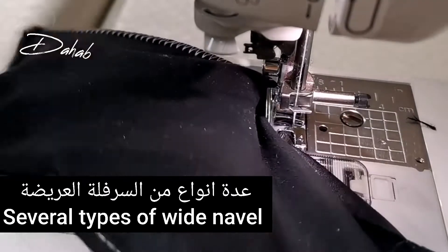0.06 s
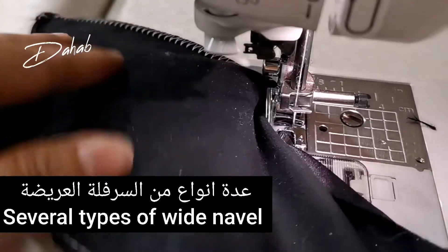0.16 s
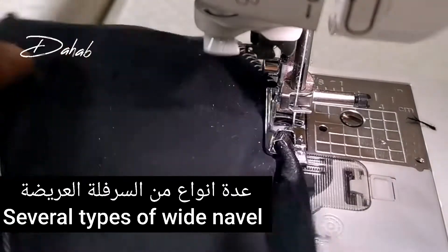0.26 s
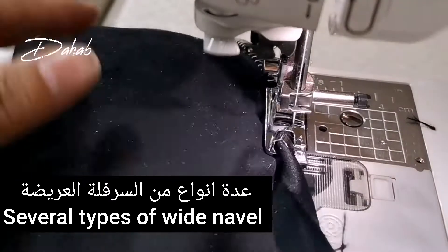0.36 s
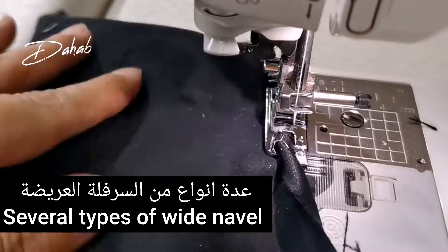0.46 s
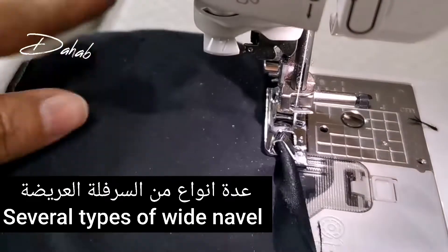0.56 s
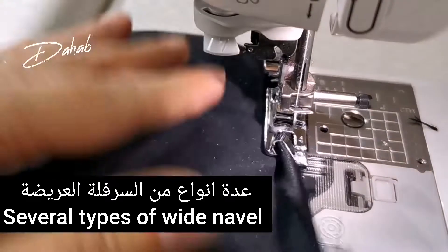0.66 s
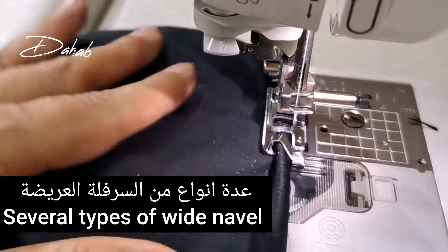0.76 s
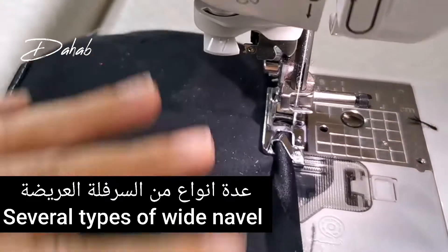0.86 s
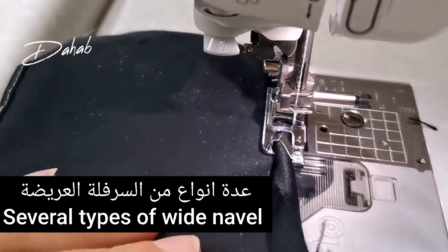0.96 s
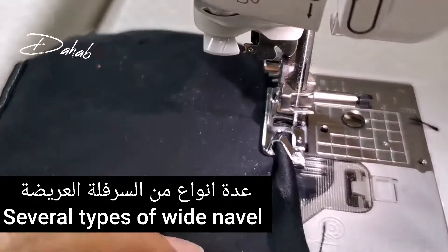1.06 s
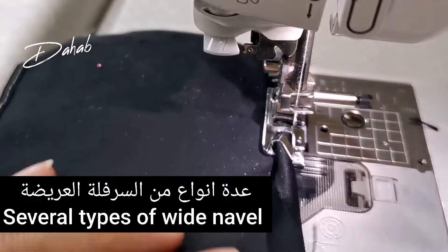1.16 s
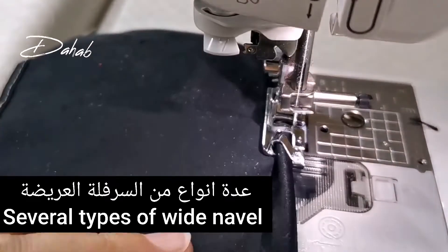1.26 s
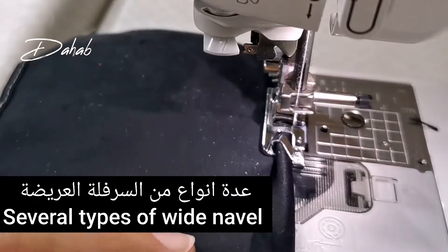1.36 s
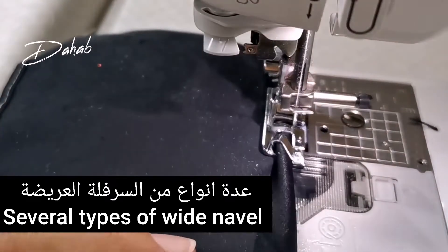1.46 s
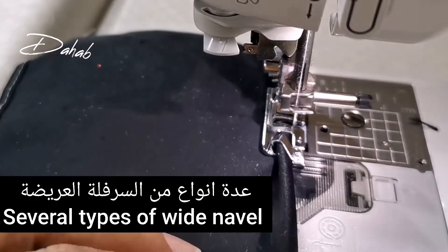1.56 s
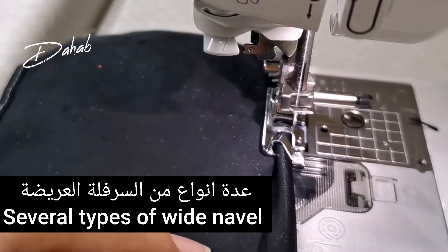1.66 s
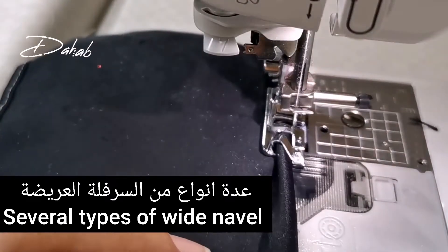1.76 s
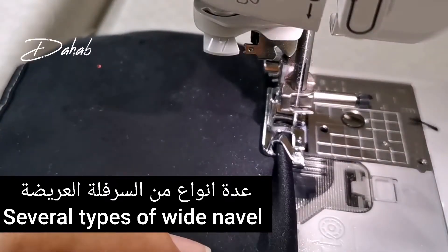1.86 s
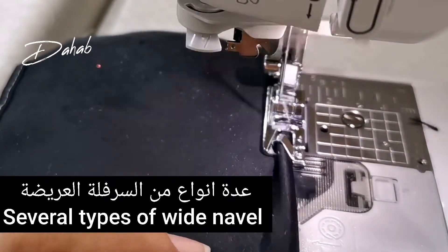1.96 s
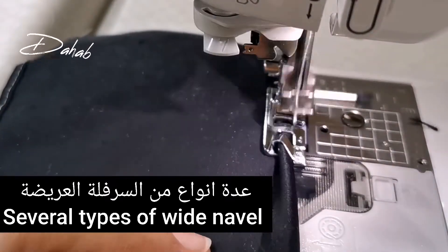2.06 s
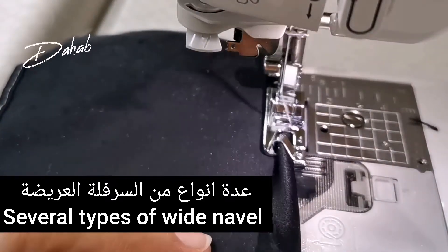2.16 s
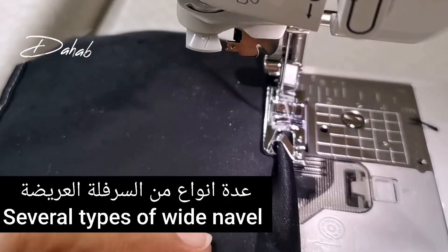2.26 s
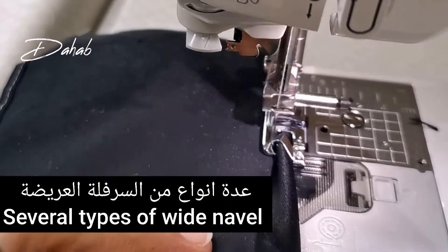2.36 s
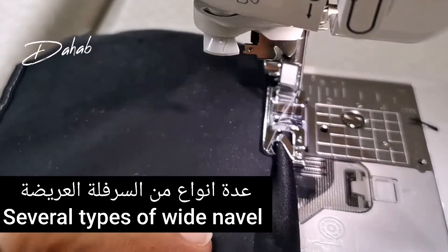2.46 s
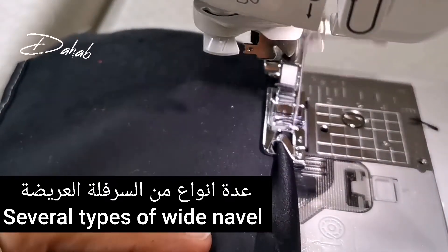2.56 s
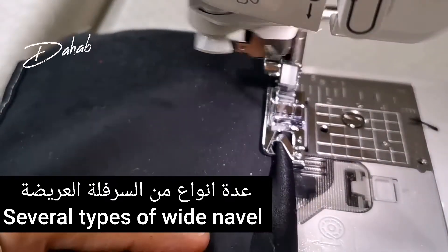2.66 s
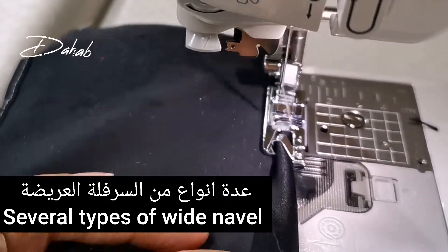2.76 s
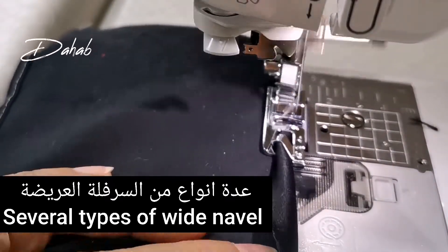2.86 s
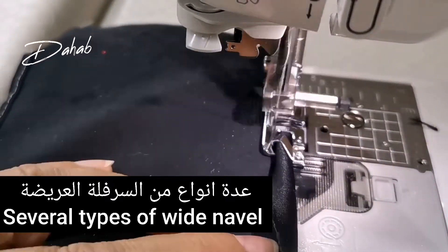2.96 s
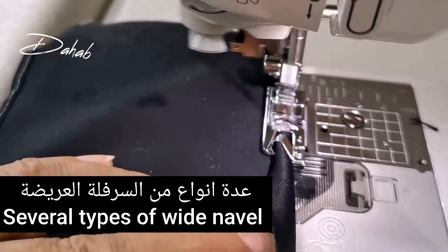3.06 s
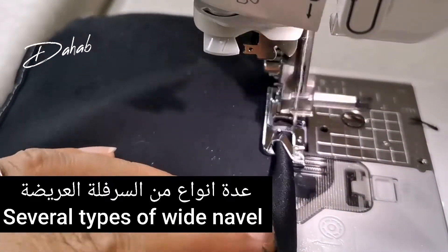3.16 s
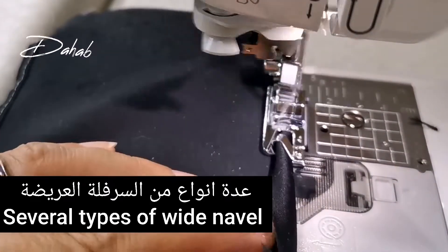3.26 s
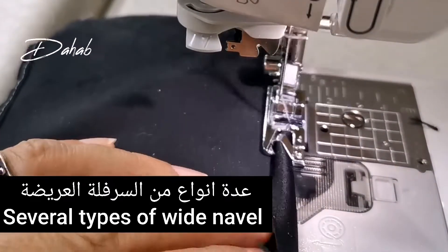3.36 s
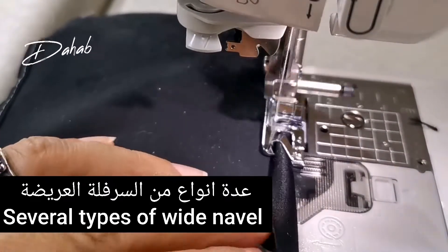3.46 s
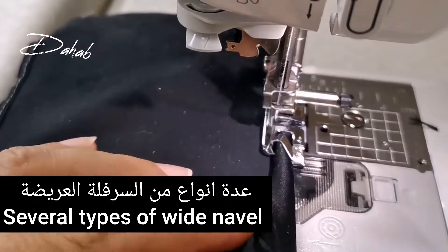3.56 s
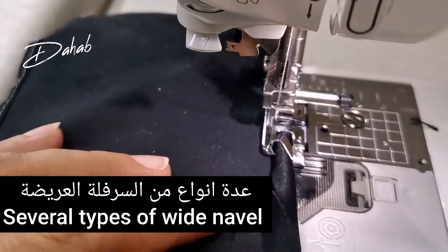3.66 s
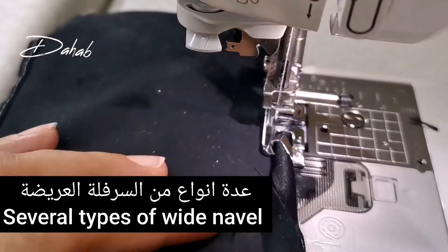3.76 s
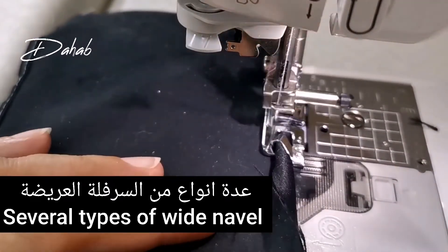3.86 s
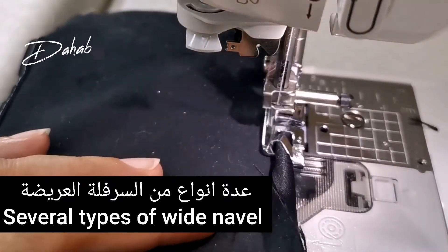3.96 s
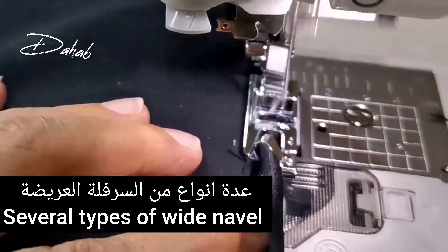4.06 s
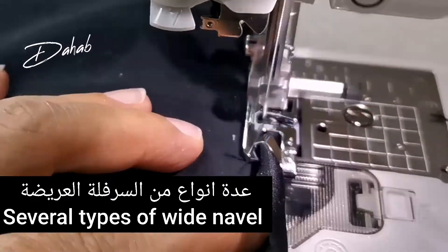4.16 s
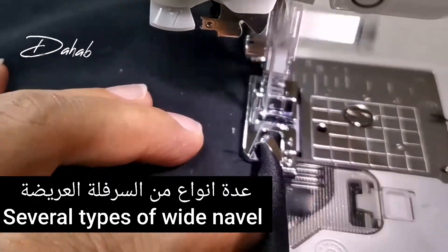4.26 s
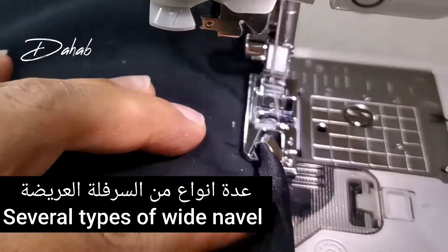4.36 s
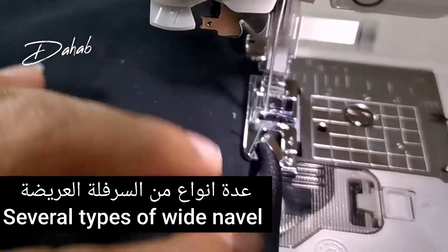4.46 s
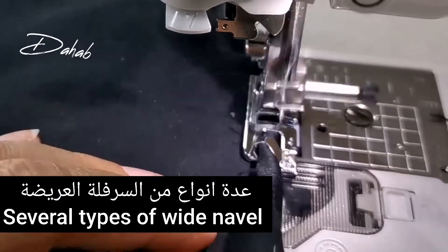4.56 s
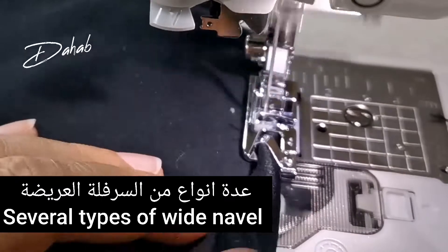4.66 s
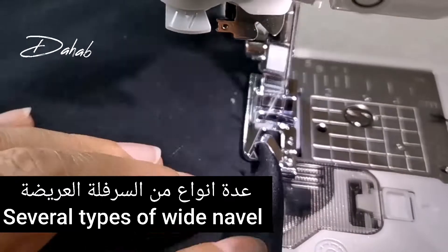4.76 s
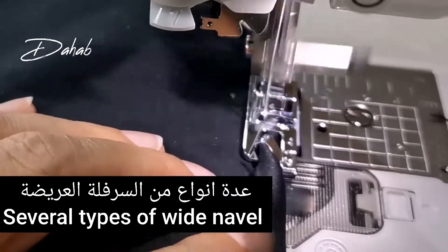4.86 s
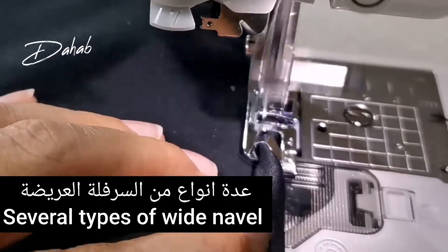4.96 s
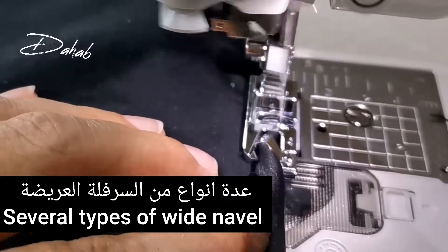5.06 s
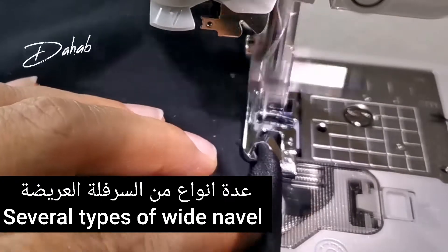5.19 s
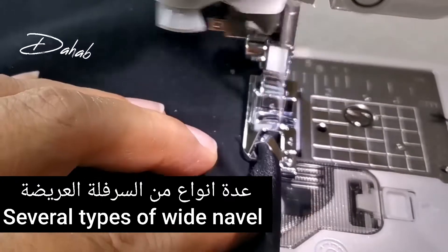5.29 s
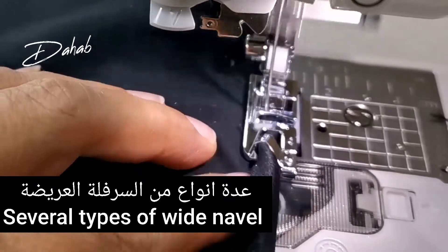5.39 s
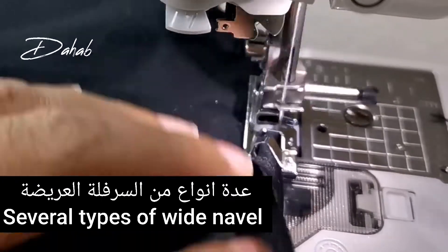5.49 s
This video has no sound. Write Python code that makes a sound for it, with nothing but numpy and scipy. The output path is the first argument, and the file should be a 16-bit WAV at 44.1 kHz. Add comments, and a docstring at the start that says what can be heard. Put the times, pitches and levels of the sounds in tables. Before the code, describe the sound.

Soft cloth swishes and hollow housing knocks come first, followed by near silence and a small click. A sewing machine jerks, hums low, then accelerates into quick metallic rasps and clacks under a climbing gear whine. After a half-second pause it starts again at constant speed, with low feed thuds and sharp ticks. Close stereo microphone, dry small room, faint low background noise.

```python
"""An electric sewing machine takes a first stitch, creeps, speeds up with a rising whine and stops; then it
runs at a steady speed in a three-stitch cycle. Gear-mesh sines make the whine, filtered noise the drive. Each
stitch is a rasp and a clack, at times with a thud of the needle bar swinging sideways: noise and blows ringing
damped modes. Cloth sliding (swelling noise), knocks, ticks and brief singing drags surround it, close by in a
small room."""
import sys
import numpy as np
from scipy import signal
from scipy.fft import rfft, irfft, next_fast_len
from scipy.io import wavfile
from scipy.ndimage import uniform_filter1d

SR = 44100
rng = np.random.default_rng(int(sys.argv[2]) if len(sys.argv) > 2 else 0)


def to_wav(s):
    """Save 16-bit WAV."""
    ch = np.atleast_2d(s).T  # columns
    pcm = np.round(np.clip(ch, -1, 1) * 32767)  # PCM
    wavfile.write(sys.argv[1], SR, pcm.astype(np.int16))


N = 243873
T = np.arange(N) / SR
FREQS = np.fft.rfftfreq(N, 1 / SR)

# All levels are relative: the functions add further gains.
# Room: background noise spectrum (frequency [Hz], level [dB])
ROOM_NOISE = [(12, -50), (20, 5.5), (52, 5), (91, -5.5), (172, -2.5), (472, -11.5), (738, -11.5),
              (1570, -18), (3340, -26), (4810, -22), (6180, -38), (8180, -49), (9950, -43), (14700, -27),
              (16000, -30)]
# Colour of the reverberant tail (frequency [Hz], level [dB])
TAIL_COLOUR = [(300, -6.5), (2000, 2.0), (12000, -10.0)]
ROOM_T60_S, ROOM_DB, FLOOR_DB = 0.17, -8.5, -64
# Left minus right (frequency [Hz], level difference [dB])
BALANCE = [(200, 2), (420, -1.5), (810, 3), (1050, -6.5), (1540, 1.5), (3000, 0), (4100, -3), (6200, -1),
           (7200, -3.5), (8300, -13), (9300, 3), (10000, 7.5), (12200, 6), (15500, 1.5)]
# Likeness of the two sides (frequency [Hz], correlation [-1 to 1])
LIKENESS = [(30, 0.16), (80, 0.33), (150, 0.94), (850, 0.45), (1150, 0.1), (4000, 0.033), (4700, 0.43),
            (5500, 0.034), (7200, 1), (9300, 0.26), (10000, 0.062), (13000, 0.41)]
# Lead of the left side (frequency [Hz], phase [rad])
LEAD = [(100, .03), (300, .4), (600, .9), (1000, 1.0), (1450, 2.9), (3700, 2.9), (4400, 4.5), (5300, 4.3),
        (5900, 6.28), (15000, 6.2)]
CUTOFF_HZ = 15800

# Cloth pushed over the bed (peak time [s], swish level [dB], rub level [dB], rise [s], fall [s])
SLIDES = [(.05, -63, -62, 0.054, 0.022), (.11, -64.5, -60, 0.018, 0.045),
          (0.335, -54, -52.5, 0.053, 0.0097), (.405, -73, -56, 0.036, 0.02), (.51, -68, -51, 0.021, .01),
          (.57, -54, -58, 0.031, 0.07), (0.757, -55, -47.5, 0.014, 0.039), (.87, -64.5, -67, 0.031, 0.019),
          (1.056, -65, -71, 0.062, 0.038), (1.24, -67, -58, .12, .05), (1.42, -73.5, -62.5, 0.068, 0.058),
          (1.56, -66.5, -56, 0.065, 0.017), (1.72, -70, -62.5, 0.11, 0.0083),
          (1.9, -65.5, -58, 0.041, 0.011), (3.65, -68, -83, 0.046, 0.059)]
# Bright swish of the cloth (frequency [Hz], level [dB])
SWISH = [(400, -8), (900, 9.5), (1400, 0), (2200, -2.5), (2800, 3), (3700, -4), (4900, 8.5), (6100, -0.5),
         (7200, -0.5), (8300, 3.5), (9500, -1.5), (12000, -4), (13500, -1.5), (16000, -3.5)]
# Dull rub of the cloth (frequency [Hz], level [dB])
RUB = [(60, -4), (125, 15.5), (200, 12), (320, 11), (520, 3), (780, 1), (1400, -30), (3000, -48.5)]
WHISPER_DB, RESTING_RUB_DB = -81.5, -81   # steady cloth noise under resting hands

# Lever, hands, drive or a hard needle-bar clack knock on the housing
# (time [s], peak level [dB], push pitch [Hz], spread [octaves], crack level [dB])
KNOCKS = [(.102, -49, 170, 0.46, -68), (0.2371, -31, 588, 0.22, -53), (0.246, -33.5, 363, 0.099, -81),
          (0.5111, -32, 840, 0.19, -54), (0.5133, -31, 334, 0.33, -54.5), (0.567, -47.5, 650, 0.7, -58),
          (0.7513, -25, 650, 0.26, -39), (.7555, -33, 480, 0.15, -68), (1.719, -55, 875, 0.33, -79),
          (1.98, -37, 410, 0.22, -75), (1.99, -33, 446, 0.24, -56), (3.034, -35, 462, 0.1, -75),
          (4.027, -58, 666, 0.3, -64), (4.916, -31, 980, .1, -64), (5.389, -26, 724.7, 0.18, -60)]
# Bright crack of a knock (frequency [Hz], level [dB])
KNOCK_CRACK = [(400, 7), (1000, 22), (1450, 15.5), (2300, 7.5), (2800, 10.0), (3800, 4.5), (5000, 7.0),
               (7000, -5.0), (16000, -14)]
# Modes of the housing (frequency [Hz], level [dB], decay by 60 dB [s])
HOUSING = [(154, 16, 0.016), (158, 3.5, 0.12), (256, 3, 0.041), (298.4, 2.5, 0.079), (352, -3, 0.033),
           (454, 4, 0.062), (542, -1.5, 0.039), (685.6, -5, 0.044), (773.5, 1, 0.025), (908, -1, 0.018),
           (1013, 2.5, 0.042), (1144, -4, 0.096), (1250, 11, 0.024), (1620, 2, 0.11)]
BASS_EDGE_HZ = 140

# Cloth drags over needle plate and foot (middle time [s], level [dB], length [s], ring pitch [Hz])
DRAGS = [(1.064, -54, 0.012, 4860), (1.237, -56, 0.024, 2620), (1.55, -60, 0.012, 1170),
         (2.437, -48.5, 0.013, 2800)]

# A loose part brushes the housing, then chatters
CHATTER_S, CHATTER_DB, CHATTER_HZ, CHATTER_GAP_S = 1.196, -35, 708, 0.012
CHATTER_LOSS_DB = 5.5   # times the square root of the touch number

# Thread and small steel parts snap (time [s], crack level [dB], ping level [dB])
TICKS = [(1.718, -52, -58), (1.905, -46, -53), (1.986, -34.5, -35), (2.258, -55, -37.5),
         (2.324, -40.5, -51), (2.358, -35, -49), (2.555, -39, -49), (2.615, -38, -31), (2.671, -33.5, -36),
         (3.102, -32, -27.5), (3.496, -62, -57), (3.932, -53, -74), (4.069, -28, -36), (4.311, -34, -56),
         (4.776, -35, -39), (4.875, -32, -33), (5.119, -33, -30), (5.347, -39, -25), (5.484, -41, -33)]
# Colours of the dry crack and of the ping (frequency [Hz], level [dB])
TICK_CRACK = [(1500, -7), (4500, -1.0), (7000, -2.5), (9500, -2), (14000, 1.5), (16000, 0.5)]
TICK_PING = [(3000, -13.5), (4800, -2), (6000, -16), (7250, 5), (7700, -1), (8200, -6), (9500, -17),
             (14000, -15.5)]

# Two spells of sewing, each (time [s], gear mesh pitch [Hz], load level [dB])
SPEED = [
    [(1.975, 201, -7), (1.99, 738.5, 1.5), (2.05, 900, 0), (2.11, 850.5, 3.5), (2.16, 291.7, -3),
     (2.23, 302.6, 8), (2.29, 258.7, -1.5), (2.38, 303.7, -0.5), (2.51, 300, 4.5), (2.56, 520.3, 0),
     (2.75, 760.3, 1), (2.92, 764.6, -1.5), (2.985, 875, 2.5), (3.06, 972, -1), (3.2, 1011, 1),
     (3.41, 1042, -1.5), (3.46, 230, -5.5), (3.6, 40.3, -1.5)],
    [(4.027, 839, -1.5), (4.1, 827.5, -0.5), (4.6, 829.2, 1.5), (5.05, 829, -0.5), (5.25, 849.7, -0.5),
     (5.54, 854, 1)],
]
STEADY_SPEED_HZ = 830   # mesh pitch
# Lines of the whine (multiple of rotor speed [-], level [dB])
ORDERS = [(4, -15.5), (11, -35), (12, 0.5), (13, -52), (24, -22)]
TEETH = 12   # on the pinion
# The housing favours the whine near one pitch (mesh pitch [Hz], whine level [dB])
WHINE = [(200, -96), (300, -57.5), (500, -62), (720, -66), (780, -41), (835, -38.5), (900, -47),
         (1000, -49.5)]
WHINE_FLUTTER_DB = 2.4

# Drive: levels at the steady speed, and the power of the speed by which each part grows
RUMBLE_DB, RUMBLE_POWER = -42, 0.99
WHIRR_DB, WHIRR_POWER, WHIRR_FLUTTER_DB = -54.5, 1.24, 3
# Rumble of the drive (frequency [Hz], level [dB])
RUMBLE = [(50, -30), (100, -12.5), (135, -5), (180, -0.5), (225, -1.5), (280, 4.5), (360, -1), (462, 4),
          (580, -3), (740, 4.5), (860, 1), (1030, -5), (1350, -12), (2600, -30.5)]
# Resonances of the steel parts (frequency [Hz], width [Hz], level [dB])
STEEL = [(1530, 140, -0.5), (1860, 770, 0.5), (2863, 330, 7), (3510, 140, 1.5), (4006, 115, 7),
         (4433, 315, 4.5), (4766, 270, 7.5), (5060, 460, -15), (7065, 344, 6), (7960, 110, 0.5),
         (10700, 370, -61), (10800, 430, -27), (13150, 1100, -15.5), (14300, 740, -11)]

# Needle strokes while the speed still changes (time [s], rasp level [dB], clack level [dB])
STROKES = [(2.034, -34.5, -30.5), (2.093, -40.5, -31), (2.215, -50, -52), (2.25, -71, -59),
           (2.521, -37.5, -35), (2.56, -48, -45), (2.644, -35.5, -34.5), (2.736, -35.5, -33),
           (2.819, -36, -31.5), (2.841, -44.5, -38.5), (2.924, -36.5, -31.5), (2.992, -34, -34),
           (3.07, -36.5, -31.5), (3.14, -36.5, -32.5), (3.212, -36.5, -35.5), (3.266, -37.5, -33.5),
           (3.341, -37, -36), (3.397, -41, -31.5), (3.458, -81, -41.5), (3.495, -63, -55)]
# The needle bar jumps sideways (time [s], peak level [dB])
THUDS = [(2.088, -37), (2.224, -37), (2.52, -32.5), (2.926, -34)]
# Needle strokes of one cycle at the steady speed (place [stitches], rasp level [dB], clack level [dB])
CYCLE_STROKES = [(.19, -36.5, -37.5), (1.11, -40, -43), (1.44, -45.5, -48), (2.18, -36.5, -34)]
# Sideways jumps of the needle bar in one cycle at the steady speed (place [stitches], peak level [dB])
CYCLE_THUDS = [(.66, -29), (1.2, -36), (1.6, -40), (2.2, -36.5), (2.6, -26.5)]
CYCLE_START_S, CYCLE_STITCHES, TURNS_PER_STITCH = 4.03, 3, 5.48
RASP_LAG_S, RASP_RISE_S, RASP_FALL_S = 0.003, 0.01, 0.015
CLACK_HZ, CLACK_SCATTER_DB, CLACK_RISE_S = 733, 5, .009
CLINK_SPREAD_S, THUD_SCATTER_DB = .006, 3


def from_db(db):
    """Decibel law: amplitude ratio from level."""
    return 10 ** (np.asarray(db) / 20)


def rms_one(x):
    """Normalisation to unit mean power."""
    return x / np.sqrt(np.mean(x ** 2) + 1e-20)


def at_hz(points, hz=FREQS):
    """Interpolation of a table on a log-frequency axis."""
    f, value = np.transpose(points)
    return np.interp(np.log(hz + 1e-3), np.log(f), value)


def shape(x, gain):
    """Linear filtering: multiply the spectrum by a gain at each frequency."""
    size = next_fast_len(N + 4096)   # padding against wrap-around
    size_gain = np.interp(np.fft.rfftfreq(size, 1 / SR), FREQS, gain)
    return irfft(rfft(x, size) * size_gain, size)[..., :N]


def coloured(x, spectrum):
    """Spectral colouring to unit power."""
    return rms_one(shape(x, from_db(at_hz(spectrum))))


def drift(rate_hz):
    """Low-passed chance: noise through two equal poles, with spread 1."""
    step, settle = 40, 2000
    r = np.exp(-2 * np.pi * rate_hz * step / SR)
    noise = rng.standard_normal(N // step + settle + 2)
    slow = signal.lfilter([1], [1, -2 * r, r * r], noise)[settle:]
    return np.interp(np.arange(N) / step, np.arange(len(slow)), rms_one(slow))


def widen(mid, side):
    """Partial coherence: mid and side are mixed by the likeness at each frequency."""
    alike = np.clip(at_hz(LIKENESS), -1, 1)
    shared = shape(mid, np.sqrt((1 + alike) / 2))
    opposed = shape(side, np.sqrt((1 - alike) / 2))
    return shared + opposed * [[1], [-1]]


def grains(spread_db):
    """Friction as a dense stereo train of tiny contacts of uneven strength."""
    hold = 16   # samples that share one strength
    luck = np.repeat(rng.standard_normal(N // hold + 1), hold)[:N]
    return rms_one(widen(*(rng.standard_normal((2, N)) * from_db(spread_db * luck))))


def add(out, s, sound):
    """Superposition: mix a sound in at a time."""
    start = min(max(round(s * SR), 0), N)
    out[start:start + len(sound)] += sound[:N - start]


def swells(rows):
    """Rubbing envelopes (s, dB, rise s, fall s): Gaussian growth, exponential decay."""
    total = 0
    for s, db, rise_s, fall_s in rows:
        fade = np.where(T < s, ((T - s) / rise_s) ** 2, (T - s) / fall_s)
        total = total + from_db(db) * np.exp(-np.minimum(fade, 20))
    return total


def snaps(rows, decay_s, rise_s):
    """Impulsive contact: envelopes (s, dB) that rise and decay exponentially."""
    t, out = T[:SR // 20], np.zeros(N)
    for s, db in rows:
        add(out, s, from_db(db) * np.exp(-t / decay_s) * (1 - np.exp(-t / rise_s)))
    return out


def blows(rows, scatter_db, rise_s):
    """Modal excitation: blows (s, dB, Hz, octaves) ring damped modes near the pitch of the push."""
    hz, mode_db, t60 = np.transpose(HOUSING)
    t, out = T[:SR // 8], np.zeros(N)
    signs = (-1.) ** np.arange(len(hz))
    decays = from_db(-60 * t / t60[:, None])
    modes = signs[:, None] * np.exp(2j * np.pi * hz[:, None] * t) * decays
    scatter = rng.standard_normal((len(rows), len(hz)))
    for (s, db, push_hz, octaves), luck in zip(rows, scatter):
        reach = (1 + (np.log2(hz / push_hz) / octaves) ** 2 / 2) ** -2
        strengths = from_db(mode_db + scatter_db * luck) * reach
        ring = strengths @ modes * (1 - np.exp(-t / rise_s))
        loudest = np.sqrt(uniform_filter1d(np.abs(ring) ** 2, SR // 150).max())
        add(out, s, from_db(db) * ring.imag / loudest)
    # a small housing radiates little bass
    high_pass = signal.butter(3, BASS_EDGE_HZ, "high", fs=SR, output="sos")
    return signal.sosfilt(high_pass, out + 1e-18)


def room_noise():
    """Stationary noise: a steady, coloured and partly coherent background."""
    return from_db(FLOOR_DB) * coloured(widen(*rng.standard_normal((2, N))), ROOM_NOISE)


def cloth_slides():
    """Sliding friction: a bright swish and a dull rub swell with each push of the cloth."""
    sliding = swells([(s, db, rise, fall) for s, db, _, rise, fall in SLIDES])
    pressing = swells([(s, db, rise, fall) for s, _, db, rise, fall in SLIDES])
    swish = (from_db(WHISPER_DB) + sliding) * coloured(grains(spread_db=3.0), SWISH)
    rub = (from_db(RESTING_RUB_DB) + pressing) * coloured(grains(spread_db=5.5), RUB)
    return from_db(2.5) * swish + from_db(-5.0) * rub


def room(x):
    """Reverberation: a short dull decaying noise tail, unrelated on the two sides."""
    t = T[:SR // 3]
    tail = rng.standard_normal((2, len(t))) * from_db(-60 * t / ROOM_T60_S)
    tail *= t > .004   # delay of the first reflection, s
    tail /= np.linalg.norm(tail, axis=1, keepdims=True)
    echoes = signal.oaconvolve(x, tail, axes=1)[:, :N]
    return shape(echoes, from_db(ROOM_DB + at_hz(TAIL_COLOUR)))


def housing_knocks():
    """Impact: a blow rings the housing modes while the contact itself gives a bright crack."""
    knocks = blows([row[:4] for row in KNOCKS], scatter_db=2.0, rise_s=.0004)
    cracks = snaps([(row[0], row[4]) for row in KNOCKS], decay_s=0.0066, rise_s=0.000062)
    bright = coloured(grains(spread_db=0.5), KNOCK_CRACK)
    return from_db(.5) * knocks + from_db(8.0) * cracks * bright


def drags():
    """Friction-driven resonance: noise in one narrow band sings faintly for a moment."""
    out = 0
    for s, db, length_s, hz in DRAGS:
        band = signal.lfilter(*signal.iirpeak(hz, 9.0, fs=SR), rng.standard_normal(N))
        out = out + from_db(db) * np.exp(-((T - s) / length_s) ** 2) * rms_one(band)
    return out


def chatter(count=5):
    """Repeated impact: a brush, then ever softer touches of a loose part ring the housing."""
    touches = [(CHATTER_S - .006, CHATTER_DB - 7, CHATTER_HZ, .16)]   # the brush
    for k in range(count):
        db = CHATTER_DB - CHATTER_LOSS_DB * np.sqrt(k)
        touches.append((CHATTER_S + k * CHATTER_GAP_S, db, CHATTER_HZ, .16))
    return blows(touches, scatter_db=2.0, rise_s=.004)


def ticks():
    """Sudden release: a dry bright crack, and a ping from the small steel part that was plucked."""
    cracks = snaps([(s, db) for s, db, _ in TICKS], decay_s=0.0018, rise_s=0.00041)
    pings = snaps([(s, db) for s, _, db in TICKS], decay_s=0.0044, rise_s=0.00069)
    crack = coloured(grains(spread_db=4.0), TICK_CRACK)
    ping = coloured(grains(spread_db=2.0), TICK_PING)
    return from_db(2.0) * cracks * crack + pings * ping


def motor(speed_hz):
    """Gear meshing: harmonics of the rotor speed, strongest at tooth rate, waver in pitch and level."""
    mesh_hz = speed_hz * (1 + 0.00393 * drift(28.9))
    turns = np.cumsum(mesh_hz) / SR / TEETH
    lines = 0
    for order, db in ORDERS:
        level = from_db(db + WHINE_FLUTTER_DB * drift(30))
        lines = lines + level * np.sin(2 * np.pi * order * turns)
    strength = from_db(at_hz(WHINE, speed_hz)) * (speed_hz > 0)
    return np.sqrt(2) * strength * lines, turns


def steel(x, direct_db, shift_db):
    """Parallel resonance: steel parts ring more or less strongly as the points of contact move."""
    out = from_db(direct_db) * x
    power = from_db(2 * direct_db)
    for hz, width_hz, db in STEEL:
        r = np.exp(-np.pi * width_hz / SR)
        pushed = x * from_db(db + shift_db * drift(18.2))
        zeros = [(1 - r * r) / 2, 0, (r * r - 1) / 2]
        poles = [1, -2 * r * np.cos(2 * np.pi * hz / SR), r * r]
        out = out + signal.lfilter(zeros, poles, pushed + 1e-18)
        power = power + from_db(2 * db) * (1 - r)
    return out / np.sqrt(power)


def drive(speed, load_db, turns):
    """Amplitude modulation: belt and shaft rumble and gear whirr throb with each turn of the rotor."""
    throb = from_db(load_db + 1.3 * np.sin(2 * np.pi * turns))
    rumble_level = speed ** RUMBLE_POWER * from_db(RUMBLE_DB + 2.2 * drift(25))
    rumble = rumble_level * coloured(grains(spread_db=4.0), RUMBLE)
    whirr_level = speed ** WHIRR_POWER * from_db(WHIRR_DB + WHIRR_FLUTTER_DB * drift(54))
    whirr = steel(whirr_level * grains(spread_db=1.0), direct_db=-25, shift_db=2.0)
    return throb * (rumble + whirr)


def looped(rows, turns):
    """Periodicity in rotor angle: the contacts of one cycle recur, places in stitches becoming times."""
    stitch = (turns - np.interp(CYCLE_START_S, T, turns)) / TURNS_PER_STITCH
    events = []
    for first in range(0, int(stitch[-1]) + 1, CYCLE_STITCHES):
        for place, *levels in rows:
            if first + place < stitch[-1]:
                events.append((np.interp(first + place, stitch, T), *levels))
    return events


def clinks(strokes, decay_s, count=3, size=7):
    """Inharmonic partials: a few steel contacts within each stroke, each with its own short bright set."""
    t, out = T[:SR // 30], np.zeros((2, N))
    for s, db, _ in strokes:
        for late, luck in rng.standard_normal((count, 2)):
            hz = rng.uniform(2400, 15000, (size, 1))
            partials = np.sin(2 * np.pi * hz * t) * np.exp(-t / decay_s)
            # strengths partly shared by the two sides
            strengths = rng.standard_normal(size) + .5 * rng.standard_normal((2, size))
            for side, sound in zip(out, strengths @ partials / np.sqrt(size)):
                add(side, s + CLINK_SPREAD_S * late, from_db(db + 2 * luck) * sound)
    return out


def needle_rasps(strokes):
    """Stick-slip: rubbing needle and hook, with small clinks, excite the steel resonances."""
    rubbing = swells([(s + RASP_LAG_S, db, RASP_RISE_S, RASP_FALL_S) for s, db, _ in strokes])
    catching = from_db(-6.5 + 0.72 * drift(124))   # the steel catches and slips within a stroke
    contacts = rubbing * catching * grains(spread_db=2.0)
    contacts = contacts + from_db(-6.5) * clinks(strokes, decay_s=0.0058)
    return steel(contacts, direct_db=-11.5, shift_db=4.0)


def needle_bar_clacks(strokes):
    """Soft-edged impact: the needle bar rings the housing modes near one pitch."""
    rows = [(s, db, CLACK_HZ, .22) for s, _, db in strokes]
    return from_db(6.0) * blows(rows, CLACK_SCATTER_DB, CLACK_RISE_S)


def needle_bar_thuds(jumps):
    """Double impact: the swinging needle bar touches lightly, then lands on the low housing modes."""
    touches = [(s - .009, db, 235, .6) for s, db in jumps]
    landings = [(s, db, 255, .55) for s, db in jumps]
    touch = from_db(-7.0) * blows(touches, THUD_SCATTER_DB, rise_s=0.0069)
    return touch + from_db(-2.46) * blows(landings, THUD_SCATTER_DB, rise_s=0.00048)


def stitches(turns):
    """Superposed contacts: rasp, clack and thud, single at first and then cyclic."""
    strokes = STROKES + looped(CYCLE_STROKES, turns)
    jumps = THUDS + looped(CYCLE_THUDS, turns)
    return needle_rasps(strokes) + needle_bar_clacks(strokes) + needle_bar_thuds(jumps)


def scene():
    """Interference: reflections from the bed give each side its own colour and delay."""
    spells = [np.transpose(spell) for spell in SPEED]
    speed_hz = sum(np.interp(T, s, hz, left=0, right=0) for s, hz, _ in spells)
    load_db = sum(np.interp(T, s, db, left=0, right=0) for s, _, db in spells)
    whine, turns = motor(speed_hz)
    machine = cloth_slides() + housing_knocks() + drags() + chatter() + ticks()
    machine = machine + drive(speed_hz / STEADY_SPEED_HZ, load_db, turns) + stitches(turns)
    machine = machine + room(machine) + whine   # the whine has no tail
    lean_db = at_hz(BALANCE) / 2
    left = shape(machine[0], from_db(lean_db))
    right = shape(machine[1], from_db(-lean_db) * np.exp(-1j * at_hz(LEAD)))
    return np.array([left, right]) + room_noise()


def record(dry):
    """Band limiting: a steep elliptic low-pass cuts the top."""
    low_pass = signal.ellip(10, .2, 70, CUTOFF_HZ, fs=SR, output="sos")
    return signal.sosfilt(low_pass, dry)


dry = scene()
out = record(dry)
to_wav(out)
```